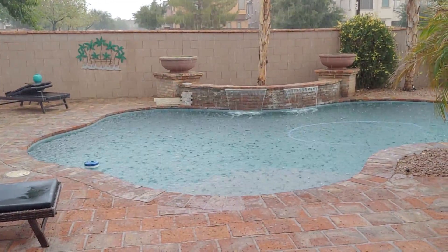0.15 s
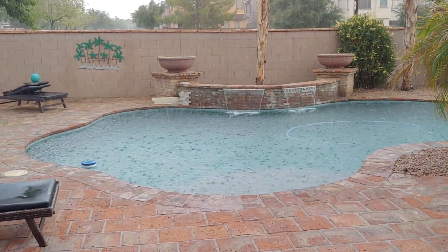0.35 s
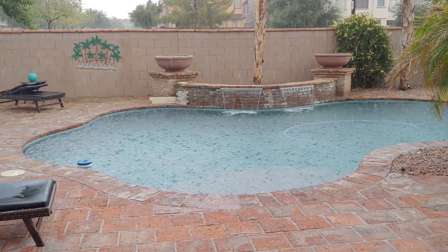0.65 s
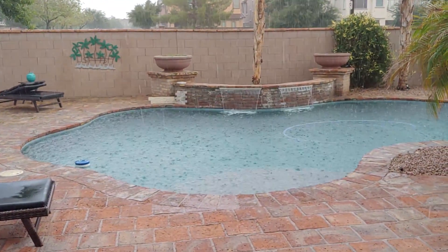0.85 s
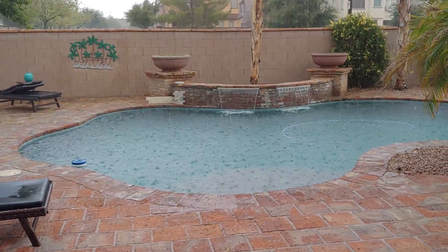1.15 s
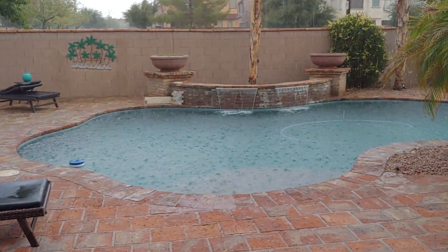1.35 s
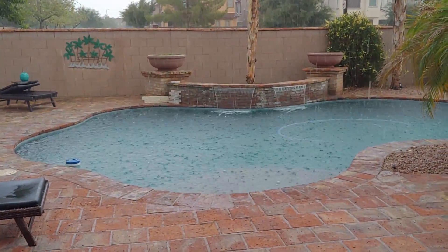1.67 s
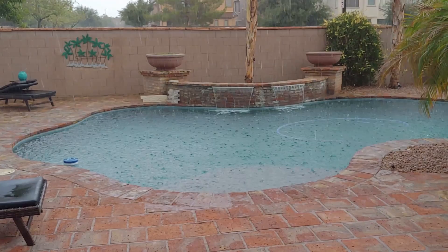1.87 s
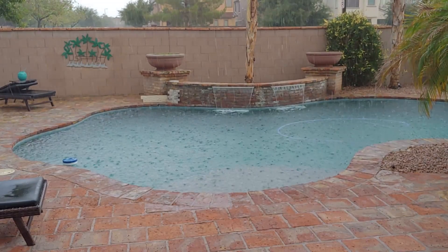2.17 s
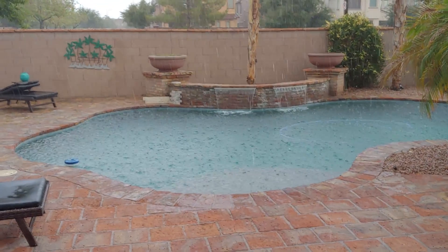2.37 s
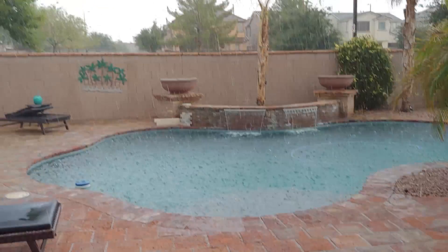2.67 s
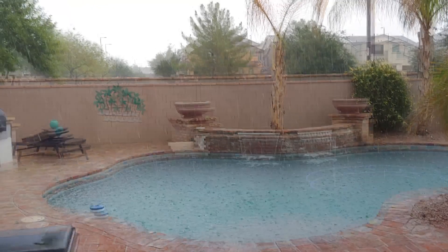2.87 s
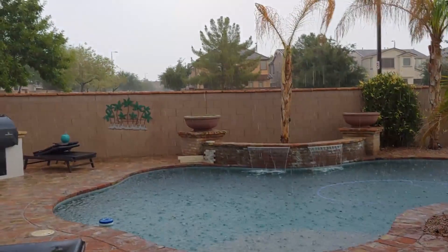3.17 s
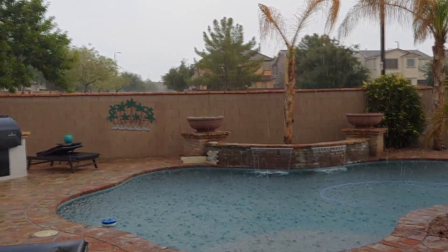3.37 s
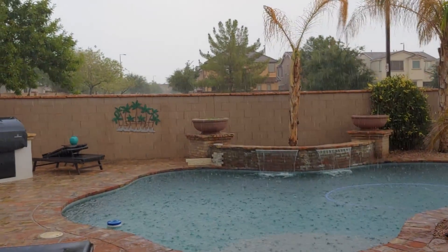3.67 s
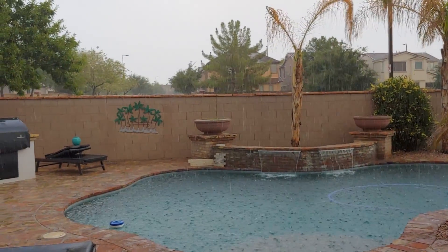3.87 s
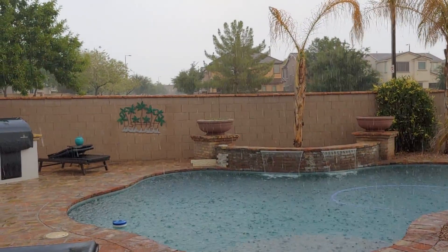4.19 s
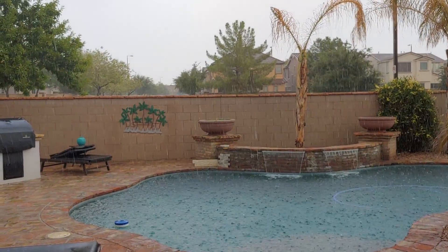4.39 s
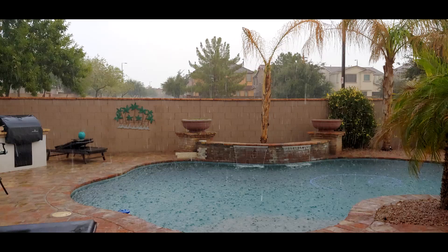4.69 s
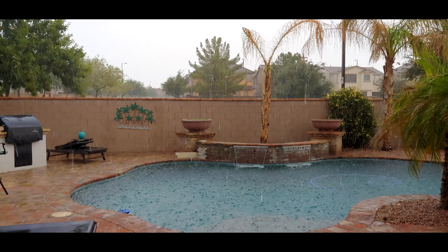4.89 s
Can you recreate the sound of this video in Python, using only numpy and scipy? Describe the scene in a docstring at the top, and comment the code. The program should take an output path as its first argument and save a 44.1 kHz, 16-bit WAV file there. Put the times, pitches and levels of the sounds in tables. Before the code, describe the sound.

Dense outdoor downpour on pool water and stone, ticking and pattering close by over a distant engine hum, cut off suddenly near the end.

```python
"""Heavy rain hisses on a garden swimming pool and the pavers round it, heard at two closely spaced microphones.
Noise makes the far drops; filtered random clicks make nearer ones tick on stone and patter dully on cushions.
A distant engine drones as a gliding sine and a motor whines in wavering tones.
Broadband pulses make fat drips, decaying sines make bubbles, and click runs make spatters on the wet stone.
The motor's hum swells once, and all sound cuts off shortly before the end."""
import sys
import numpy as np
from scipy import signal
from scipy.fft import rfft, irfft
from scipy.io import wavfile

SR = 44100
rng = np.random.default_rng(int(sys.argv[2]) if len(sys.argv) > 2 else 0)


def unload_audio(sound):
    """Save the sound as a 16-bit wav file, at the path given as the first command line argument."""
    columns = np.transpose(np.atleast_2d(sound))
    # keep every value between -1 and 1, then stretch to whole-number steps
    steps = np.round(np.clip(columns, -1, 1) * 32767)
    wavfile.write(sys.argv[1], SR, steps.astype(np.int16))


N = 222097
HZ = np.fft.rfftfreq(N, 1 / SR)
T = np.arange(N) / SR

# Easing and thickening of the dull patter, followed by the low gurgles too: (time [s], relative level [dB])
PATTER_LEVEL = [(0, 0.5), (.12, -0.5), (.34, -3.5), (.48, 3), (.6, -3), (.75, 2), (.9, -5), (1.07, 1),
                (1.23, -8.5), (1.37, 0.5), (1.55, -4), (1.7, -2), (1.8, -12), (2.02, 0.5), (2.2, -5),
                (2.36, -2), (2.48, -1), (2.6, -2.5), (2.74, 1), (2.86, -6.5), (2.96, 1), (3.08, -2),
                (3.35, -3), (3.68, 0.5), (3.78, .5), (3.9, -4), (4.05, 2.5), (4.45, .5)]


def amp(db):
    """A level in decibels is twenty times the logarithm of amplitude; this returns the amplitude."""
    return 10 ** (np.asarray(db) / 20)


def unit(x):
    """Root-mean-square normalisation: equal mean power makes levels comparable."""
    return x / np.sqrt(np.mean(x ** 2) + 1e-20)


def read(points, hz):
    """Linear interpolation of a spectrum table on a log-frequency axis, close to the ear's pitch scale."""
    f, value = np.transpose(points)
    return np.interp(np.log(hz + 1), np.log(f + 1), value)


def drift(rate_hz):
    """Low-pass-filtered noise is a slow random motion, here up to about rate_hz."""
    spectrum = rfft(rng.standard_normal(N))
    return unit(irfft(spectrum * np.exp(-(HZ / rate_hz) ** 2), N))


def band(hz, centre_hz, octaves):
    """A resonance-like band: a Gaussian bell on a log-frequency axis."""
    return np.exp(-.5 * (np.log2((hz + 1) / centre_hz) / octaves) ** 2)


def at_ports(spectra, hz):
    """Spatial coherence: waves long beside the port spacing reach both ports nearly alike."""
    # Likeness of the two ports: (frequency [Hz], left-right correlation [-1 to 1])
    coherence = [(60, 0.94), (200, 0.94), (340, 0.89), (480, 0.52), (700, 0.55), (960, -0.0083),
                 (1500, -0.41), (2100, 0.26), (3500, -0.043), (15000, -0.014)]
    angle = np.arccos(np.clip(read(coherence, hz), -1, 1)) / 2
    mid = np.cos(angle) * spectra[0]
    side = np.sin(angle) * spectra[1]
    return np.array([mid + side, mid - side])


def place(sound, db, pan_db):
    """Interaural-style cues: the nearer port hears a source louder and a little sooner; positive pan is left."""
    greatest_lag_s, full_side_db = .0003, 6
    lag = int(round(greatest_lag_s * np.tanh(pan_db / full_side_db) * SR))
    left, right = sound * np.ones((2, 1))
    pair = np.array([np.roll(left, max(-lag, 0)), np.roll(right, max(lag, 0))])
    return pair * amp([[db + pan_db / 2], [db - pan_db / 2]])


def add(mix, s, sound):
    """Superposition: a stereo sound adds linearly to the mix from time s."""
    part = mix[:, round(s * SR):][:, :sound.shape[1]]
    part += sound[:, :part.shape[1]]


def far_hiss(level_db=-2.5, swell_db=0.08, flutter_db=0.53):
    """Central-limit principle: far drops too many to tell apart sum to gently fluctuating Gaussian noise."""
    gain = amp(level_db + swell_db * drift(2.7) + flutter_db * drift(30))
    return rfft(rng.standard_normal((2, N)) * gain)


def impacts(per_s, spread_db, limit):
    """Shot noise: random impacts of uneven size, each with its own delay and balance between the ports."""
    count = int(per_s * N / SR)
    moment, lean, size, sign = rng.random((count, 4)).T
    # sizes are exponentially spread in dB, cut off at limit times spread_db
    size = amp(spread_db * np.minimum(-np.log(1 - size), limit)) * np.sign(sign - .5)
    lag = np.round((lean - .5) * 40).astype(int)  # up to 20 samples either way
    at = (moment * N).astype(int)
    left = np.bincount(at, size * np.cos(lean * np.pi / 2), N)
    right = np.bincount((at + lag) % N, size * np.sin(lean * np.pi / 2), N)
    return unit(np.array([left, right]))


def splash(clicks, spray, spray_s):
    """Convolution with decaying noise gives each impact a short dying spray of droplets and echoes."""
    t = T[:SR // 10]
    tail = rng.standard_normal((2, len(t))) * np.exp(-t / spray_s)
    tail *= spray / np.linalg.norm(tail[0])
    return unit(clicks + signal.oaconvolve(clicks, tail, axes=1)[:, :N])


def near_drops(ticks_db=-4.5, patter_db=-3.0, patter_below_hz=850, clump_db=1.48, patter_clump_db=1.2):
    """Band-filtered shot noise: low patter on soft things, high ticks on stone and water."""
    flurry_db, flurry_hz = 0.2, 4.3  # depth and speed of random flurries
    centres = np.geomspace(130, 14000, num=12)
    shapes = np.array([band(HZ, hz, octaves=0.61) for hz in centres])
    shapes /= np.sqrt((shapes ** 2).sum(0) + .05)  # overlapping bands share the power
    patter_course_db = np.interp(T, *np.transpose(PATTER_LEVEL))
    flurry = amp(patter_db + patter_course_db + flurry_db * drift(flurry_hz))
    out = 0
    for hz, shape in zip(centres, shapes):
        if hz < patter_below_hz:
            clicks = impacts(per_s=175, spread_db=2.5, limit=3.0)
            drops = flurry * splash(clicks, spray=0.5, spray_s=0.0064)
            drops = drops * amp(patter_clump_db * drift(11.4))
        else:
            clicks = impacts(per_s=520, spread_db=2.5, limit=3.8)
            drops = amp(ticks_db) * splash(clicks, spray=0.73, spray_s=0.011)
            drops = drops * amp(clump_db * drift(23))
        out = out + shape * rfft(drops)
    return out


def paver_ticks(level_db=-16.5):
    """Short impacts have wide spectra: the closest drops crack on wet pavers across the whole treble."""
    clicks = splash(impacts(per_s=130, spread_db=2.5, limit=7.1), spray=0.81, spray_s=0.0038)
    return amp(level_db) * rfft(clicks) * band(HZ, centre_hz=4500, octaves=2.7)


def rain(level_db=-58.0):
    """Spectral shaping: far and near drops together take the colour of the yard."""
    # The rain as a whole over a low outdoor rumble: (frequency [Hz], relative spectral density [dB per Hz])
    rain_spectrum = [(12, -16), (32, -1.5), (45, -8), (62, -5), (92, -5), (170, -2), (280, -4.7),
                     (470, -7.5), (680, -2.5), (1000, -10), (2000, -9), (4000, -11.5), (16000, -21.5)]
    density = amp(level_db + read(rain_spectrum, HZ)) * np.sqrt(SR / 2)
    drops = far_hiss() + near_drops() + paver_ticks()
    return irfft(at_ports(drops, HZ) * density, N)


def machines(wobble=0.017, throb_db=3.3, waver=0.68, pan_db=2.0):
    """Periodic sources: phase integrates the engine's sagging firing rate; random sway broadens motor tones."""
    # The engine picks up, then sags until it picks up again: (start time [s], initial mean firing rate [Hz])
    engine_pulls = [(0, 77.67), (3.12, 75.4)]
    # Loudness of the distant engine before its random throb: (time [s], rms level [dB])
    engine_level = [(0, -43.5), (.95, -41), (1.6, -40), (1.95, -46), (2.4, -45.5), (2.7, -41), (3.1, -44.5),
                    (4.4, -61)]
    # Wavering motor tones, as from a pool pump: (frequency [Hz], rms level [dB], speed of random sway [Hz])
    motor_tones = [(57.8, -47, 4.8), (114.1, -47.5, 6.5), (352.7, -51, 4.2), (611.7, -50.5, 2.6),
                   (2050, -64, 3.3)]
    sag_hz_per_s = 3.9
    firing_hz = np.zeros(N)
    for start, top_hz in engine_pulls:
        firing_hz = np.where(T >= start, top_hz - sag_hz_per_s * (T - start), firing_hz)
    turns = np.cumsum(firing_hz * (1 + wobble * drift(9.7))) / SR
    engine_db = np.interp(T, *np.transpose(engine_level)) + throb_db * drift(10.0)
    out = amp(engine_db) * np.sin(2 * np.pi * turns)
    for tone_hz, tone_db, sway_hz in motor_tones:
        sway = 1 + waver * (drift(sway_hz) + 1j * drift(sway_hz))  # amplitude and phase
        tone = (sway * np.exp(2j * np.pi * tone_hz * T)).real
        out = out + amp(tone_db) * unit(tone) / np.sqrt(2)
    return np.sqrt(2) * out * amp([[pan_db / 2], [-pan_db / 2]])


def big_drops(spray=0.23, echo=0.35, echo_s=0.003):
    """Impulse and reflection: a fat drip's pulse bounces off the paving amid a soft dying spray."""
    # Fat drips close by, from dull thuds to bright snaps:
    # (time [s], pulse peak level [dB], centre [Hz], width [octaves], left-right difference [dB])
    drips = [(.011, -25.5, 458, 0.55, 0.5), (.0504, -22.5, 5500, .3, 0.5), (.2704, -26, 3700, .25, -1),
             (.3081, -26, 493, 0.54, -3), (.328, -23, 3900, .25, 6), (.4094, -23, 660, 0.36, 0.5),
             (.4494, -23.5, 523, 0.35, -2.5), (.5107, -23.5, 520, 0.53, -8.5), (.538, -24.5, 420, 0.7, 8),
             (.6292, -22.5, 680, .3, 4), (.671, -24, 330, 0.51, 2), (.727, -22.5, 430, .75, 5),
             (.739, -25, 320, 0.55, 1), (.7754, -24.5, 10800, .1, 2.5), (.8015, -21, 520, 0.57, -2.5),
             (0.8202, -13.5, 2900, .8, -3.5), (1.049, -24, 390, 0.54, 6.5), (1.088, -25.5, 575, 0.51, 6),
             (1.0959, -24, 3570, .5, -2), (1.371, -26, 700, .7, 4.5), (1.4104, -22, 4200, .25, -2.5),
             (1.4932, -15.5, 8800, .11, -5.5), (1.5274, -24, 6700, .15, 0.5),
             (1.5614, -22.5, 5100, .3, 1.5), (1.5922, -23, 3450, .4, -2.5), (1.7129, -21, 460, 0.67, 3.5),
             (2.0109, -20.5, 380, 0.79, 5), (2.016, -25.5, 720, .35, 1), (2.9318, -22.5, 450, 0.7, 5),
             (2.9783, -24, 330, .6, -1), (3.0467, -16.5, 3750, 0.49, 1), (3.1744, -20.5, 540, .65, 5),
             (3.5687, -20, 546, 0.93, 6), (3.5809, -22.5, 540, 0.6, -1.5), (3.5924, -23, 13800, .06, 0),
             (3.6663, -19.5, 485, 0.63, 3.5), (3.7698, -20.5, 620, 0.44, -2),
             (3.8798, -18, 1850, 0.65, 0.5), (3.8828, -23.5, 3650, .17, 0.5), (3.99, -22.5, 470, 0.56, 2),
             (4.0428, -17, 1470, .42, -2.5), (4.2395, -12.5, 13800, .18, -8),
             (4.3017, -23.5, 510, 0.61, -1.5), (4.347, -20, 570, 0.37, -2.5)]
    # low thuds spray longest: time constant at 1 kHz, and the power of pitch by which it shortens
    ring_1khz_s, ring_slope = .011, 0.3
    out, t = np.zeros((2, N)), T[:SR // 4]
    hz = np.fft.rfftfreq(len(t), 1 / SR)
    lead = SR // 100  # room for the pulse's rise before its peak
    for s, db, centre_hz, octaves, pan_db in drips:
        colour = band(hz, centre_hz, octaves)
        phase = np.exp(2j * np.pi * rng.random())
        bounce = 1 + echo * np.exp(-2j * np.pi * hz * echo_s)
        pulse = irfft(colour * phase * bounce, len(t))
        ring_s = ring_1khz_s * (1000 / centre_hz) ** ring_slope
        noise = rfft(rng.standard_normal((2, len(t))))
        droplets = unit(irfft(at_ports(noise, hz) * colour, len(t)))
        envelope = np.exp(-t / ring_s) * (1 - np.exp(-t * centre_hz))
        drop = pulse / abs(pulse).max() + spray * droplets * envelope
        add(out, s - lead / SR, place(np.roll(drop, lead, axis=1), db, pan_db))
    return out


def bubble(pitch_hz, cycles):
    """A trapped air bubble is a damped oscillator: it swells for some cycles and dies, rising in pitch."""
    rise = .008  # share by which the pitch has climbed when loudest
    t = T[:SR // 25]
    age = t * pitch_hz / cycles
    return age * np.exp(1 - age) * np.sin(2 * np.pi * pitch_hz * t * (1 + rise * age / 2))


def bubbles(per_s, db, spread_db, low_hz, high_hz, cycles, width_db):
    """A population of oscillators: small bubbles of many pitches at random times and places."""
    out = np.zeros((2, N))
    for when, size, pitch, side in rng.random((int(per_s * N / SR), 4)):
        ring = bubble(low_hz * (high_hz / low_hz) ** pitch, cycles)
        add(out, when * N / SR, place(ring, db + spread_db * (size - .5), width_db * (side - .5)))
    return out


def plops(wet_s=.013, yard_echo=.38):
    """Bubble resonance and diffuse reverberation: gurgles, plips, plinks and clear plops echo in the yard."""
    # Bubbles that plop or plink clearly on the pool:
    # (time [s], peak level [dB], starting pitch [Hz], time until loudest [cycles], left-right difference [dB])
    clear_plops = [(.442, -29, 720, 2.5, 0), (1.5352, -27, 1840, 2.2, -3), (1.866, -29, 640, 1.9, 1),
                   (2.41, -21.5, 1450, 2.1, -1.5), (2.426, -28, 735, 1.4, -1), (2.452, -27, 673, 2.1, 1),
                   (2.474, -28, 361, 1, 3), (2.997, -30, 730, 3, 1), (3.089, -30, 7600, 9, 2),
                   (3.46, -28, 680, 1.6, 1), (3.529, -35, 7240, 12, -1.5), (3.6555, -32, 1680, 2.4, 1),
                   (4.1015, -30, 2200, 2.7, 1), (4.188, -26, 667, 1.5, 0), (4.468, -26, 757, 1.7, 3.5)]
    gurgles = bubbles(per_s=38, db=-34.5, spread_db=6, low_hz=420, high_hz=830, cycles=1.6, width_db=5)
    out = gurgles * amp(np.interp(T, *np.transpose(PATTER_LEVEL)))
    # plips, then tiny plinks
    out += bubbles(per_s=45, db=-35.5, spread_db=3.5, low_hz=1198, high_hz=3635, cycles=2.2, width_db=9.5)
    out += bubbles(per_s=35, db=-34.0, spread_db=7, low_hz=3400, high_hz=6950, cycles=3.5, width_db=7)
    for s, db, pitch_hz, cycles, pan_db in clear_plops:
        add(out, s, place(bubble(pitch_hz, cycles), db, pan_db))
    t = T[:SR // 10]
    tail = rng.standard_normal((2, len(t))) * t * np.exp(-t / wet_s)
    tail *= yard_echo / np.linalg.norm(tail[0])
    return out + signal.oaconvolve(out, tail, axes=1)[:, :N]


def spatters(per_s=260, scatter=0.76, spread_db=4.0):
    """A filtered impulse train: a run of water breaks into a string of droplets that swells and dies."""
    # Runs of water on the wet stone: (time [s], length [s], rms level with short margins [dB],
    # centre [Hz], width [octaves], left-right difference [dB])
    water_runs = [(.806, .048, -37, 2150, .42, -3), (0.818, .028, -38.5, 3500, .6, -1.5),
                  (1.499, .11, -39.5, 4700, .86, -1), (2.006, 0.042, -38, 230, .7, 2),
                  (2.392, .044, -46, 1900, .36, -1), (2.94, .024, -39.5, 620, .7, 4),
                  (3.877, 0.015, -41.5, 2000, .35, 1.5), (4.034, .08, -39, 1600, .6, -2)]
    out = np.zeros((2, N))
    lead = SR // 100  # margin for the filter's spread before and after
    for s, length, db, centre_hz, octaves, pan_db in water_runs:
        count = max(int(per_s * length), 2)
        size = int(length * SR) + 2 * lead
        jitter, strength, sign = rng.random((count, 3)).T
        when = (np.arange(count) + min(scatter, 1) * jitter) / count
        swell = np.sqrt(np.sin(np.pi * when))
        heights = swell * amp(spread_db * (2 * strength - 1)) * np.sign(sign - .5)
        clicks = np.bincount(lead + (when * length * SR).astype(int), heights, size)
        run = irfft(rfft(clicks) * band(np.fft.rfftfreq(size, 1 / SR), centre_hz, octaves), size)
        add(out, s - lead / SR, place(unit(run), db, pan_db))
    return out


def hum_swell(edge_s=.02):
    """Harmonic synthesis: partials of one fundamental make the motor's low hum grow louder for a moment."""
    # Partials of the hum: (multiple of the fundamental [1], rms level at full swell [dB])
    hum_partials = [(2, -36), (3, -39), (4, -35.5)]
    start_s, length_s, fundamental_hz = 1.68, .108, 58.4
    age = T - start_s
    shape = np.clip(np.minimum(age, length_s - age) / edge_s, 0, 1)
    hum = 0
    for multiple, db in hum_partials:
        cycles = multiple * fundamental_hz * T + rng.random()
        hum = hum + amp(db) * np.sin(2 * np.pi * cycles)
    return np.sqrt(2) * shape * hum


def scene():
    """Linear superposition of rain, machines, big drips, plops, spatters and the hum's swell."""
    return rain() + machines() + big_drops() + plops() + spatters() + hum_swell()


def record(dry):
    """Linear filtering by each microphone port, then the sudden stop and the upper band limit."""
    # Colour of the left and the right microphone port: (frequency [Hz], gain [dB])
    left_colour = [(700, -0.5), (1300, 3.5), (1800, -2.5), (2800, -2), (3700, 1.5), (6200, 0.5),
                   (7800, -8.5), (8450, -29.5), (9800, -4.5), (10400, -7.5), (11900, -0.5), (12700, -17),
                   (15500, -19.5)]
    right_colour = [(700, -1), (1250, 0.6), (1800, 5), (2250, 3), (2700, -3.5), (3900, 0.8), (6000, -4),
                    (7000, 10), (7700, 2), (8700, -24), (9600, -18), (12000, -13), (15500, -19.5)]
    stop_s, edge_hz = 4.486, 15750
    ports = amp([read(left_colour, HZ), read(right_colour, HZ)])
    heard = irfft(rfft(dry) * ports, N)
    running = np.interp(T, [stop_s - .003, stop_s + .001, stop_s + .03], [1, .05, 0])
    low_pass = signal.firwin(1023, edge_hz, window=("kaiser", 9), fs=SR)
    return signal.oaconvolve(heard * running, low_pass[None], "same", axes=1)


dry = scene()
out = record(dry)
unload_audio(out)
```